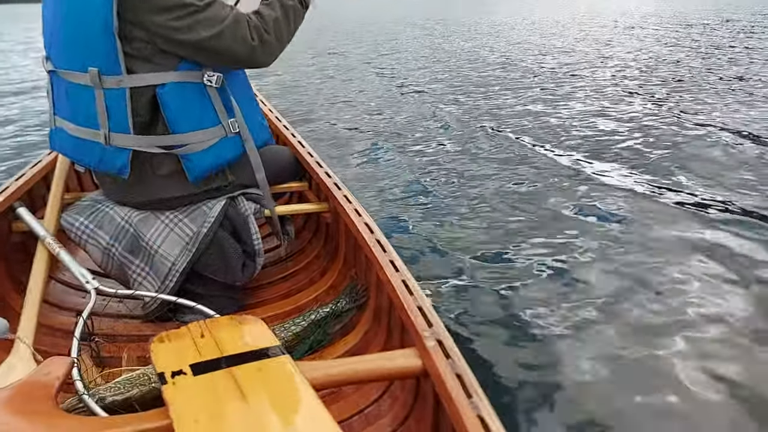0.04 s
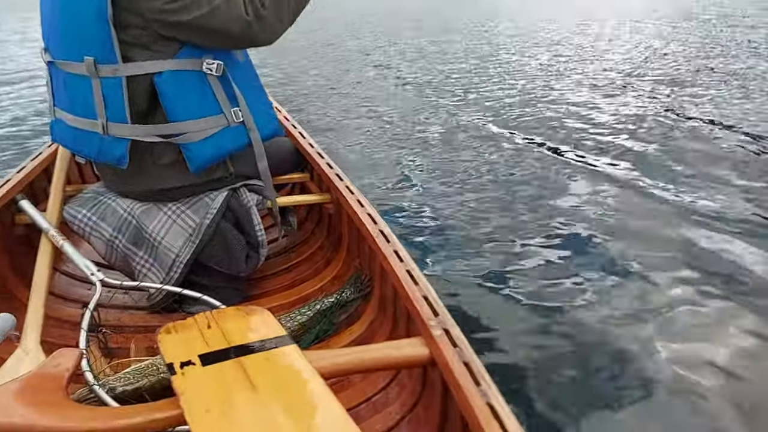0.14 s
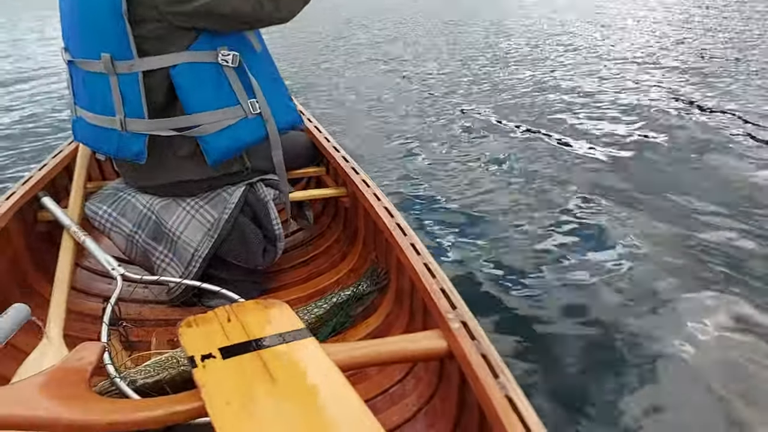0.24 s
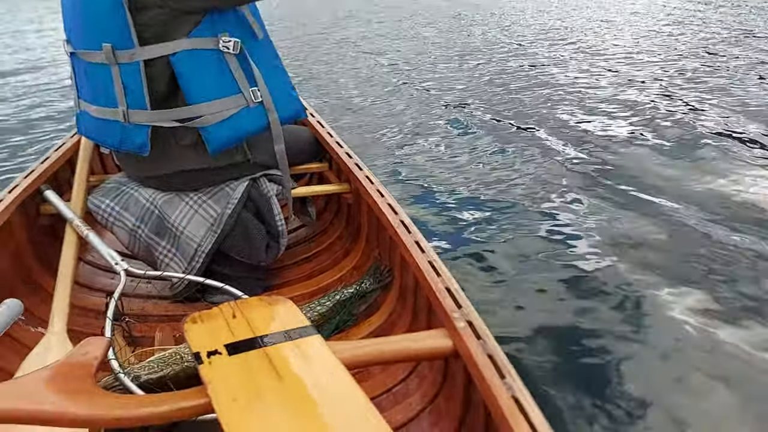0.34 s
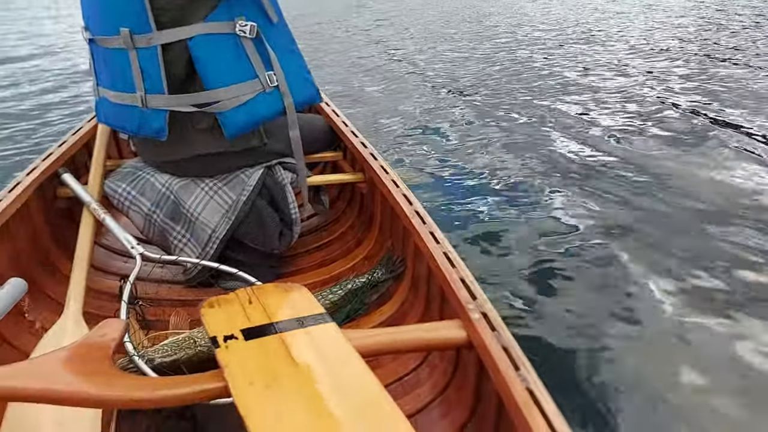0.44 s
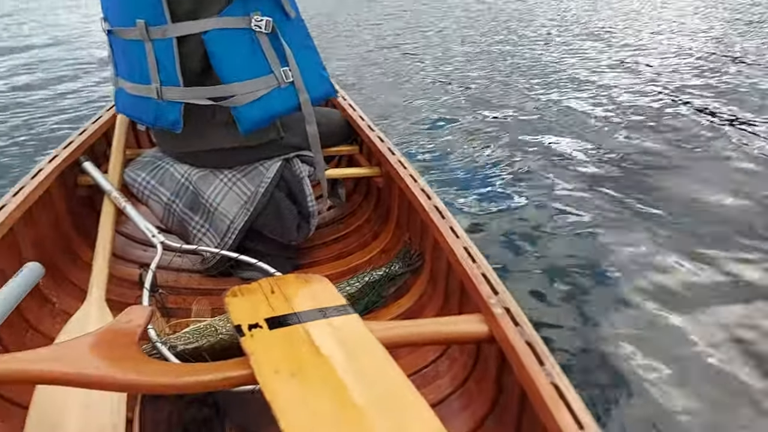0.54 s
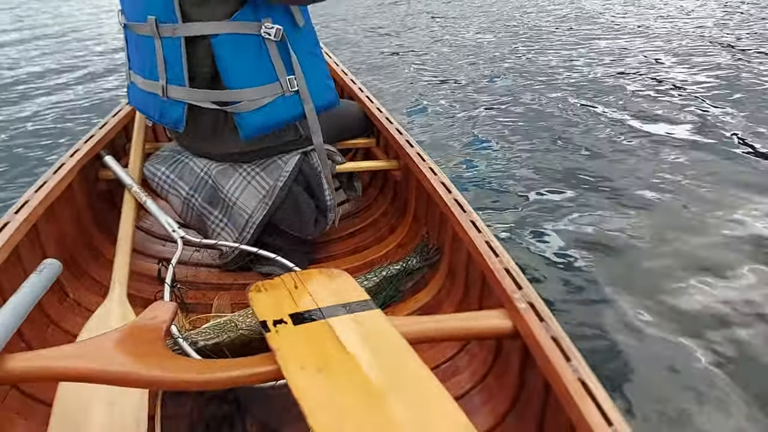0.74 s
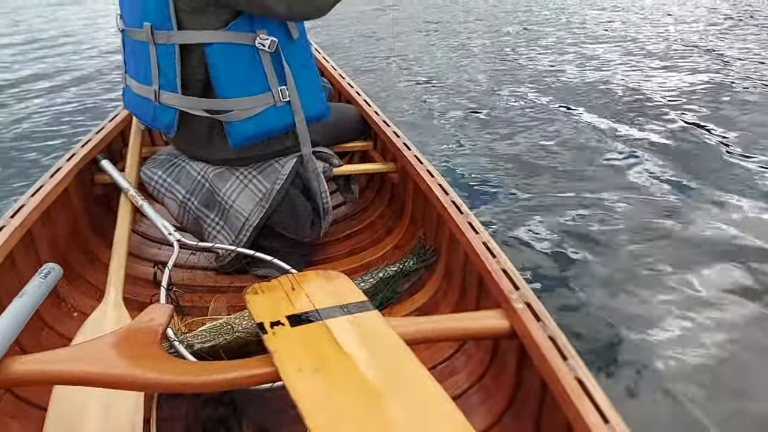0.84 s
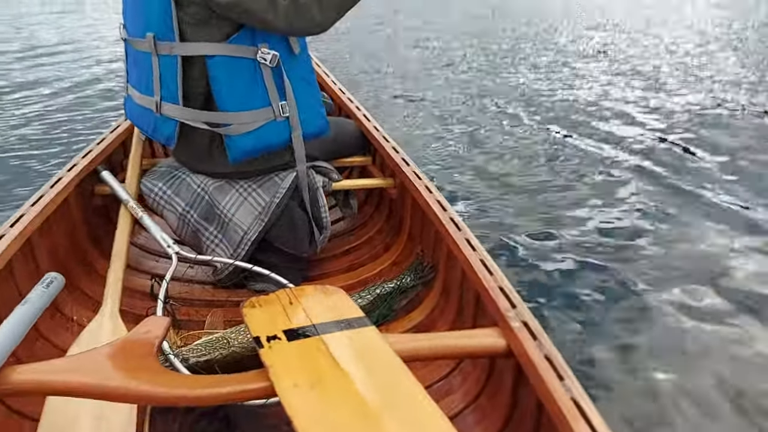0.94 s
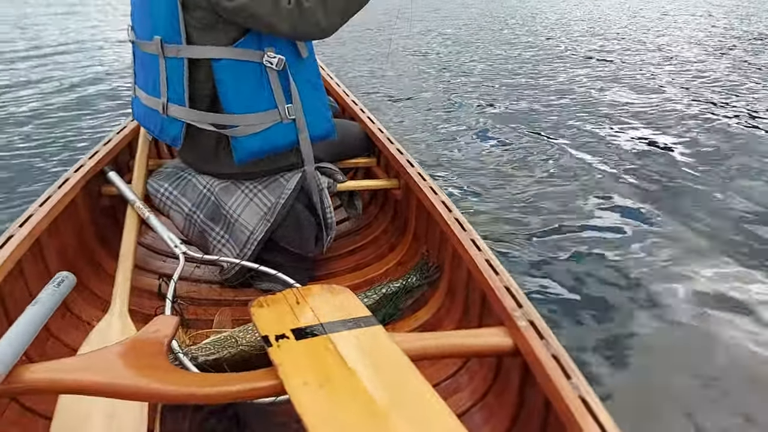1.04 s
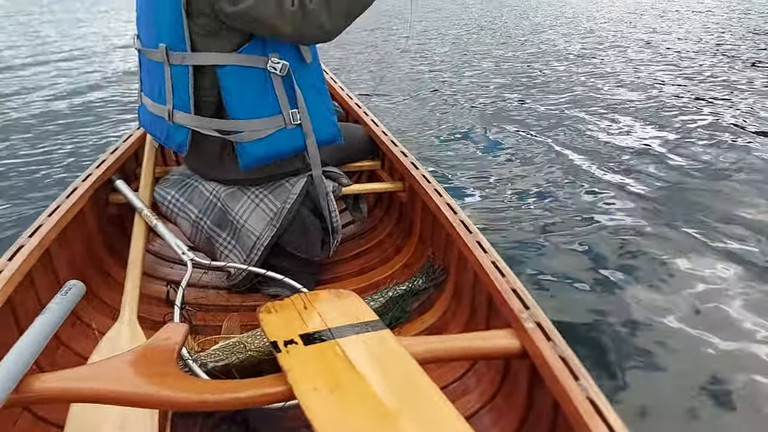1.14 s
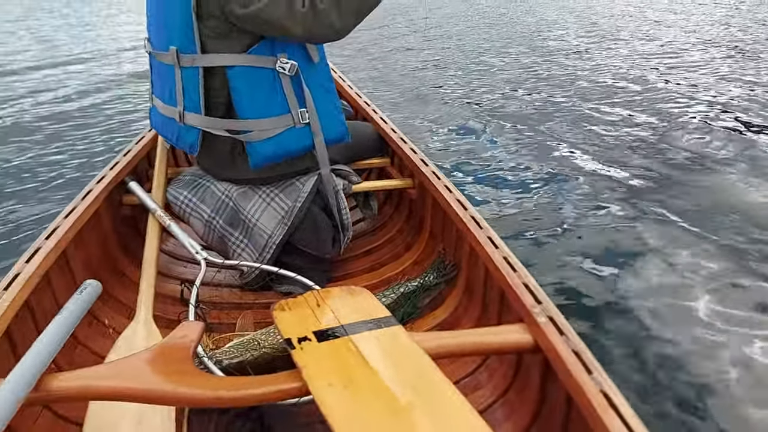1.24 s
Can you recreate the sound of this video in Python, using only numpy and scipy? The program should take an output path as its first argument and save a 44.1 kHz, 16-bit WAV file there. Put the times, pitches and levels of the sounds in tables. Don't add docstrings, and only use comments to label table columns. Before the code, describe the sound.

Hard knocks and dull thuds on a wooden canoe hull come in quick clusters, the last with a scrape and heavy thump, then near quiet; close microphone low in the hull, with faint water hiss and rumble.

```python
import sys
import numpy as np
from scipy import signal
from scipy.fft import rfft, irfft, next_fast_len
from scipy.io import wavfile
from scipy.ndimage import uniform_filter1d, map_coordinates

SR = 44100
rng = np.random.default_rng(int(sys.argv[2]) if len(sys.argv) > 2 else 0)


def dump_mix(stems):
    frames = np.atleast_2d(stems).T
    limited = np.clip(frames, -1, 1)
    pcm = np.round(limited * 32767).astype(np.int16)
    wavfile.write(sys.argv[1], SR, pcm)


def level_to_linear(level):
    exponent = np.asarray(level, float) / 20
    return 10 ** exponent


N = 57330


def unit(x):
    return x / np.sqrt(np.mean(x ** 2) + 1e-20)


def along(points, hz):
    f, value = np.transpose(points)
    return np.interp(np.log(hz + 1), np.log(f + 1), value)


def curve(rows):
    s, value = np.transpose(rows)
    return np.interp(np.arange(N) / SR, s, value)


def wobble(rate):
    knots = rng.standard_normal(int(N * rate / SR) + 4)
    return map_coordinates(knots, [np.arange(N) * rate / SR])


def filtered(x, response):
    m = next_fast_len(x.shape[-1] + 8192)
    spectrum = rfft(x, m) * response(np.fft.rfftfreq(m, 1 / SR))
    return irfft(spectrum, m)[..., :x.shape[-1]]


def sides(pan_db):
    return np.array([[pan_db / 2], [-pan_db / 2]])


def placed(x, pan_db):
    left_lead_s = 0.00016
    ears = np.array([[1], [-1]])
    return filtered(x, lambda hz: np.exp(1j * np.pi * hz * left_lead_s * ears)) * level_to_linear(sides(pan_db))


def rush(spectrum, alike):
    turn = np.arccos(np.clip(alike, -1, 1)) / 2
    a, b = filtered(rng.standard_normal((2, N)), lambda hz: level_to_linear(along(spectrum, hz)))
    middle, side = np.cos(turn) * a, np.sin(turn) * b
    return unit(np.array([middle + side, middle - side]))


def struck(modes, blows, far=True):
    scatter_db, longest_s = 2.5, 0.14
    travel_s, rise_cycles = 0.00091, 0.34
    out, t = np.zeros(N + SR), np.arange(SR // 4) / SR
    hz, level, t60 = np.transpose(modes)[:, :, None]
    late = np.clip(t - far * travel_s * np.sqrt(1000 / hz), 0, 1)
    rise = 1 - np.exp(-late * hz / rise_cycles) if far else 1
    tones = level_to_linear(-60 * late / np.minimum(t60, longest_s)) * rise * np.sin(2 * np.pi * hz * late)
    chance = rng.standard_normal((len(blows), len(modes), 1))
    for (s, db, contact_ms, spot_hz, reach), luck in zip(blows, chance):
        from_spot = np.log2(hz / spot_hz) / reach
        ring = np.sum(level_to_linear(level + scatter_db * luck - 6.5 * from_spot ** 2) * tones, axis=0)
        push = np.sin(np.pi * np.clip(t[:SR // 100] / (max(contact_ms, 0.1) / 1000), 0, 1)) ** 2
        sound = np.convolve(ring, push)[:len(t)]
        out[round(s * SR):][:len(t)] += level_to_linear(db) * sound / np.abs(sound).max()
    return out[:N]


def bursts(rows, pan_db, rise_s):
    out, t = np.zeros((2, N + SR)), np.arange(SR // 10) / SR
    noise = rng.standard_normal((len(rows), 3, len(t)))
    for (s, db, hz, width, t60), n in zip(rows, noise):
        mix = n[0] + 2.0 * n[1:]
        band = unit(filtered(mix, lambda f: np.exp(-np.abs(np.log((f + 1) / hz) / width) ** 3)))
        shape = level_to_linear(-60 * t / t60) * (1 - np.exp(-t / rise_s))
        grain = level_to_linear(2 * unit(uniform_filter1d(n[0], size=48)))
        out[:, round(s * SR):][:, :len(t)] += level_to_linear(db + sides(pan_db)) * band * shape * grain
    return out[:, :N]


# (time [s], level [dB])
HISS_LEVEL = [
    (0.0, -68.5),
    (0.148, -70.5),
    (0.266, -60.5),
    (0.524, -61.5),
    (0.68, -63.5),
    (0.886, -62.5),
    (1.11, -70),
    (1.3, -78.5),
]
# (frequency [Hz], level [dB per Hz])
HISS_COLOUR = [(1800, -3.5), (3000, -3.5), (4000, -1), (8000, -2), (9200, -9), (11500, 0), (15000, -5),
               (16300, -18.5)]


def water_hiss():
    level = curve(HISS_LEVEL) + 1.04 * wobble(61) + 1.44 * wobble(200)
    return level_to_linear(level) * rush(HISS_COLOUR, 0.089)


# (time [s], level [dB])
RUMBLE_LEVEL = [(0.0, -87), (0.024, -58.5), (0.064, -44.5), (0.114, -63.5), (0.28, -48.5), (0.302, -51.5),
                (0.442, -58), (0.474, -59), (0.638, -55), (0.666, -70), (0.744, -62), (0.844, -70.5),
                (0.916, -54), (0.962, -49.5), (0.984, -62.5), (1.28, -78)]
# (time [s], frequency [Hz])
SWAY_PITCH = [(0.0, 61), (0.16, 61.3), (0.26, 77.75), (0.6, 78.63), (0.68, 85), (0.718, 86.6),
              (0.928, 64.2), (1.128, 62.9), (1.2, 68)]
# (frequency [Hz], level [dB per Hz])
GRUMBLE_COLOUR = [(13, -47), (22, -20), (43, -11.5), (64, 6.5), (168, -27.5), (278, -17), (300, -39),
                  (390, -74), (660, -120)]


def hull_rumble():
    sway_hz = curve(SWAY_PITCH) + 3.8 * wobble(17)
    boom = np.sqrt(2) * np.sin(2 * np.pi * np.cumsum(sway_hz) / SR)
    grumble = level_to_linear(-1) * rush(GRUMBLE_COLOUR, 0.6)
    level = curve(RUMBLE_LEVEL) + 1.5 * wobble(22)
    return placed(level_to_linear(level) * (boom + grumble), -6)


# (time [s], level [dB])
LAP_LEVEL = [
    (0.0, -91),
    (0.206, -92.5),
    (0.354, -81.5),
    (0.698, -75.5),
    (0.828, -62.5),
    (0.886, -68),
    (1.18, -87.5),
    (1.3, -97),
]
# (frequency [Hz], level [dB per Hz])
LAP_COLOUR = [(71, -36), (120, -1.5), (157, 0), (226, -12), (377, -11.5), (655, -20.5), (1360, -20),
              (3000, -29.5), (3900, -80.5), (6600, -120)]


def lapping():
    level = curve(LAP_LEVEL) + 18 + 2.1 * wobble(71.37)
    return placed(level_to_linear(level) * rush(LAP_COLOUR, 0.78), -1)


# (time [s], peak level [dB],
# pitch [Hz], log width, t60 [s])
CLOTH_TICKS = [(0.0214, -59, 12200, 0.2, 0.039), (0.0407, -32.5, 5550, 0.46, 0.025),
               (.050, -51, 12700, 0.22, 0.053), (.0745, -52, 7000, 0.79, 0.073),
               (.089, -55, 12270, 0.21, 0.095), (0.1015, -46.5, 6450, 0.28, 0.031),
               (.111, -44, 5470, 0.48, 0.03), (.1296, -42, 7500, 0.19, 0.033),
               (.1296, -35.5, 13100, 0.34, 0.014), (.1961, -32, 4560, 0.27, 0.021),
               (0.224, -43.5, 11400, 0.71, 0.05), (0.265, -35, 13100, 0.27, 0.014),
               (0.3545, -42, 12500, 0.33, 0.021), (0.3622, -44, 7570, 0.098, 0.027),
               (.2305, -46, 7700, 0.086, .03), (.139, -47, 4570, 0.23, .03),
               (1.076, -69, 13100, 0.2, 0.017), (0.5339, -44, 11300, 0.72, 0.017),
               (0.9702, -45.5, 11700, 0.26, 0.016), (0.987, -54.5, 4740, 0.58, 0.059),
               (1.0982, -53, 7250, .12, 0.023), (1.112, -54, 14130, 0.17, 0.015),
               (1.279, -54.5, 12600, 0.43, 0.019)]


def cloth():
    return bursts(CLOTH_TICKS, pan_db=-0.6, rise_s=0.0023)


# (time [s], rib peak level [dB], planking over ribs [dB], click over ribs [dB])
GEAR_TAPS = [(0.1965, -22, -2, -10), (.2025, -16.5, -12, -16), (0.2159, -15.5, 1, -20),
             (.231, -24, 5.5, -26), (.244, -21, -7, -19.5), (0.259, -28.5, 0, -16.5),
             (0.2718, -28.5, -1.5, -23), (0.4032, -24.5, 8.5, -17.5), (.4088, -17.5, -1.5, -17),
             (.4212, -29.5, 3.5, -25), (0.4311, -28.5, 1.5, -18.5), (0.4374, -36, 12.5, -10),
             (0.4486, -25, -2.5, -26), (0.4617, -30, 1, -20), (0.4749, -63.5, 24, -17),
             (.654, -48.5, 10.5, -27), (0.661, -42.5, 5, -24), (0.7063, -23, 7.5, -17),
             (.823, -34, 5, -10.5), (1.134, -62.5, 2.5, -27), (1.146, -61.5, -5, -27),
             (1.1956, -62, 0.5, -18.5)]
# (frequency [Hz], level [dB], t60 [s])
RIB_MODES = [(840, -11.5, 0.094), (994.5, 0, 0.036), (1120, -4.5, 0.011), (1299, 1.5, 0.022),
             (1539, 4, 0.011), (1757, -4, 0.013), (1767, 3, 0.018), (1864, -18.5, 0.043),
             (2050, 1.5, 0.014), (2381, 0, 0.014), (4280, -23, 0.016)]
# (frequency [Hz], level [dB], t60 [s])
PLANK_MODES = [(65.7, -13, 0.2), (101.1, -19.5, 0.1), (132, -6.5, 0.14), (176.5, 0, 0.058),
               (217.4, -5, 0.075), (250, -3.5, 0.078), (286.2, 5, 0.049), (363.6, 6, 0.05),
               (397, -11.5, 0.031), (460.1, 0.5, 0.081), (514, 1, 0.059), (563.5, 7, 0.063),
               (633, 3.5, 0.029), (692, -4.5, 0.017)]


def gear_taps():
    reach = 1.095
    ribs = struck(RIB_MODES, [(s, db, 0.25, 1500, reach) for s, db, *_ in GEAR_TAPS])
    planks = struck(PLANK_MODES, [(s, db + over - 1, 1.2, 450, reach) for s, db, over, _ in GEAR_TAPS])
    clicks = [(s, db + click, 3500, 0.55, 0.025) for s, db, _, click in GEAR_TAPS]
    return placed(ribs, -6.5) + placed(planks, 0.5) + bursts(clicks, pan_db=-2.5, rise_s=0.002)


# (time [s], peak level [dB], contact [ms], pitch of the spot struck [Hz], reach [octaves])
SOFT_THUDS = [(.1972, -16, 0.81, 655, 0.93), (.2045, -15, 1.21, 550, 1.3), (0.215, -19.5, 0.76, 395, 1.9),
              (.223, -19.5, 1.87, 335, 1), (0.249, -17.5, 4.6, 250, 2.4), (0.2796, -29, 2.4, 230, 1.6),
              (0.4199, -23, 2.56, 282, 0.58), (0.456, -21, 4.1, 194.3, 0.79), (0.488, -42, 2.9, 161, 1.4),
              (0.6532, -25.5, 2.8, 303, 0.73), (0.6592, -21.5, 3.4, 162, 2.5),
              (0.7066, -16, 0.84, 565, 0.42), (0.7172, -24, 1.4, 330, 0.69), (0.7248, -21, 1.8, 434, 0.91),
              (0.732, -27.5, 2.8, 186, 0.25), (0.7427, -30, 5.4, 192, 0.48), (0.819, -19, 2, 393, 0.61),
              (0.8244, -17.5, 1.7, 413, 1.6), (0.8328, -22, 3.37, 390, 1.5), (0.849, -29, 6.1, 170, 1.24),
              (0.874, -32, 2.36, 147.5, 0.9), (0.912, -35.5, 3.86, 250, 2.3),
              (0.943, -36.5, 4.7, 112.4, 1.2), (1.016, -29.5, 4.76, 160, 1.4), (1.128, -57, 2.6, 400, 1.1),
              (1.147, -53.5, 2.24, 377.4, 0.42), (1.203, -61.5, 1.8, 400, 0.42),
              (1.261, -58.5, 2.1, 250, 1.46)]


def soft_thuds():
    blows = [(s, db - 0.5, *spot) for s, db, *spot in SOFT_THUDS]
    return placed(struck(PLANK_MODES, blows), 0.5)


# (time [s], peak level [dB], pitch [Hz], log width, t60 [s])
STRAP_SCRAPE = [(.3808, -32, 3660, 0.061, 0.017), (.381, -52, 2500, 1.5, 0.085),
                (.7095, -45.5, 7980, .2, 0.024), (.7825, -29.5, 11400, 1.2, 0.018),
                (.785, -33, 13000, 0.24, .015), (.7858, -23.5, 7160, 0.16, 0.012),
                (.7916, -35.5, 1850, 1.16, 0.054), (.797, -32.5, 1620, 0.71, 0.034),
                (.7925, -39, 7350, 0.23, 0.033), (.8025, -36, 12900, 0.66, 0.034),
                (.8035, -50, 4020, 0.84, 0.09), (.811, -37, 1420, 0.63, 0.037),
                (.812, -51, 11500, 0.6, 0.044), (.826, -45, 12000, 0.18, 0.024),
                (.829, -43.5, 4970, 0.93, 0.018), (.846, -50, 6800, .2, .015),
                (.8644, -36.5, 12800, 0.24, 0.017), (.866, -46.5, 7180, .3, 0.022),
                (.885, -53, 5660, 0.34, 0.018), (.903, -45, 3830, .3, 0.014)]


def strap_scrape():
    return bursts(STRAP_SCRAPE, pan_db=-3, rise_s=0.002)


# (time [s], peak level [dB], contact [ms], pitch of the spot struck [Hz], reach [octaves])
HEAVY_THUD = (.8248, -10, 4.5, 200, 1.1)


def heavy_thud():
    return placed(struck(PLANK_MODES, [HEAVY_THUD], far=False), 0.5)


# (frequency [Hz], t60 [s])
HULL_ECHO = [(100, 0.33), (500, 0.079), (2000, 0.08), (8000, 0.17)]


def hollow(x):
    hz, t, z = signal.stft(rng.standard_normal((2, SR // 3)), SR, nperseg=256)
    fading = z * level_to_linear(-60 * t / along(HULL_ECHO, hz)[:, None])
    middle, side = signal.istft(fading, SR, nperseg=256)[1]
    tail = middle + 0.5 * side * np.array([[1], [-1]])
    return signal.fftconvolve(x, tail / np.linalg.norm(tail[0]), axes=1)[:, :N]


def knocks():
    lowcut_hz = 115
    direct = gear_taps() + soft_thuds() + heavy_thud()
    return filtered(direct + level_to_linear(-7) * hollow(direct), lambda f: (1j * f / (lowcut_hz + 1j * f)) ** 2)


def scene():
    river = water_hiss() + hull_rumble() + lapping()
    return river + cloth() + knocks() + strap_scrape()


def low_pass(x):
    return signal.sosfilt(signal.butter(12, 16580, fs=SR, output="sos"), x)


def record(dry):
    mix = filtered(dry, lambda hz: 1 / (1 + (hz / 15900) ** 80))
    return low_pass(mix)


dry = scene()
out = record(dry)
dump_mix(out)
```